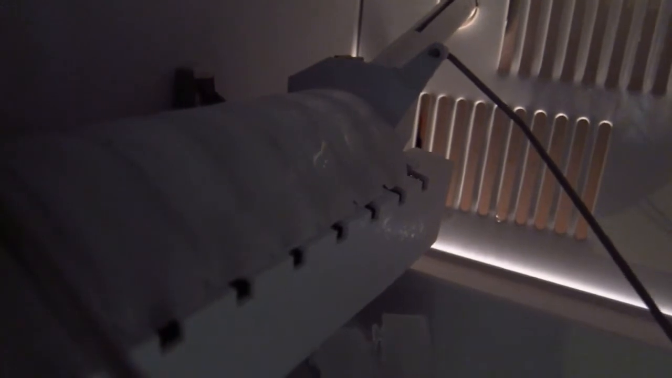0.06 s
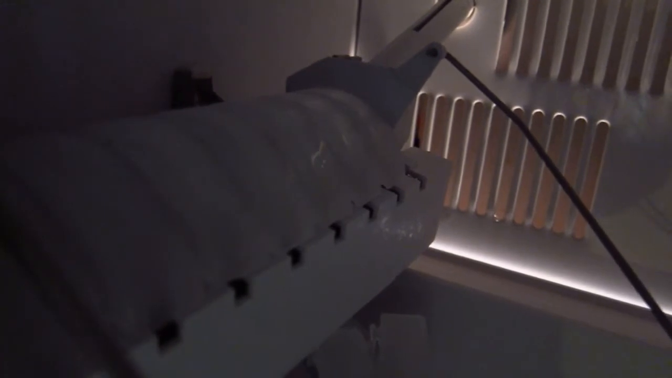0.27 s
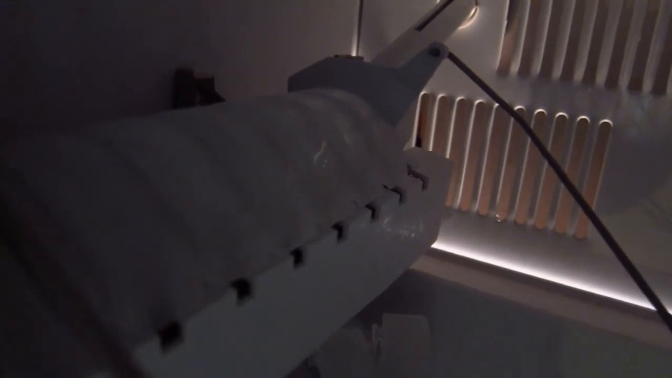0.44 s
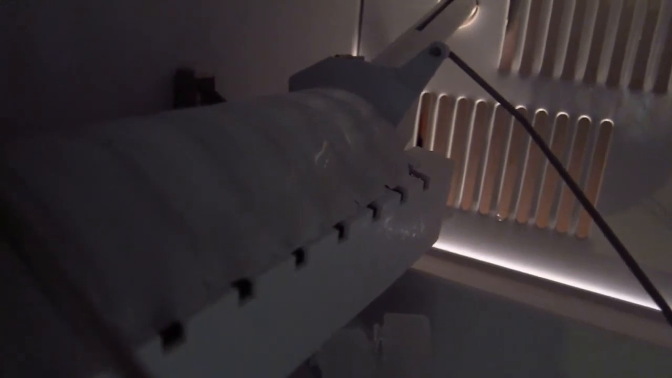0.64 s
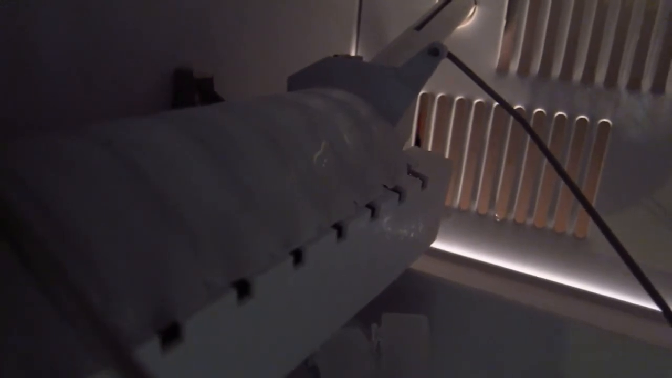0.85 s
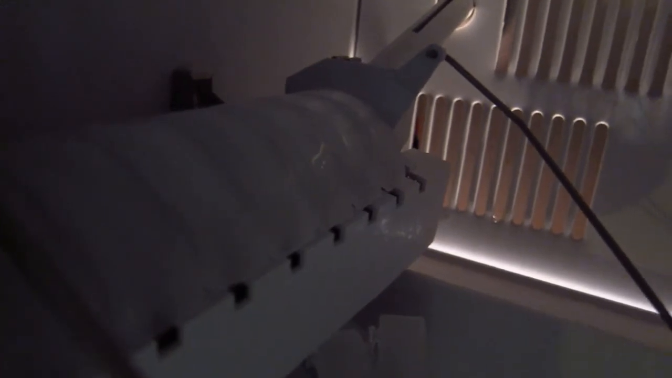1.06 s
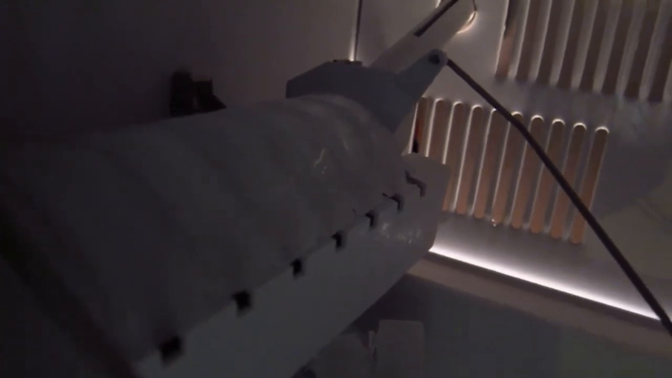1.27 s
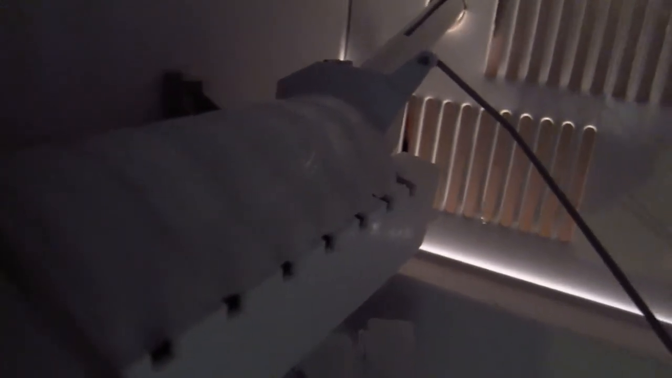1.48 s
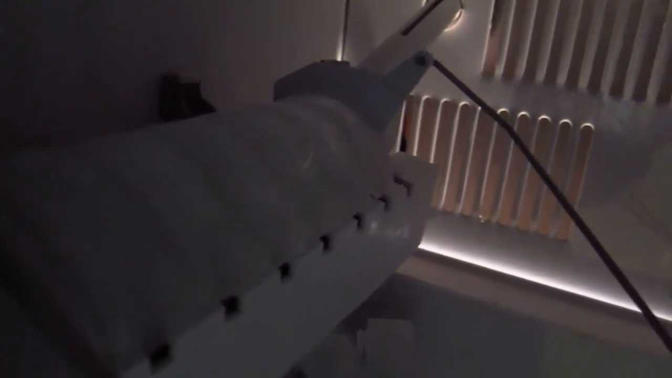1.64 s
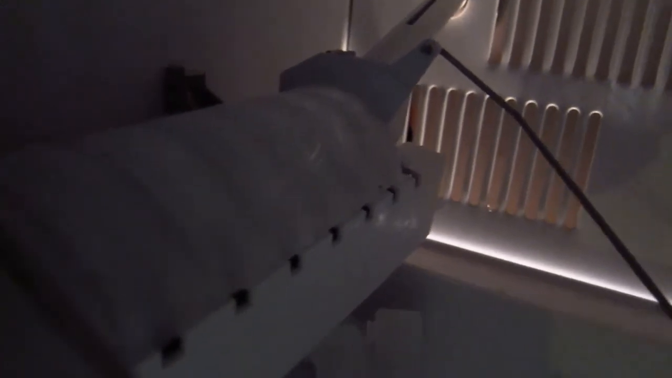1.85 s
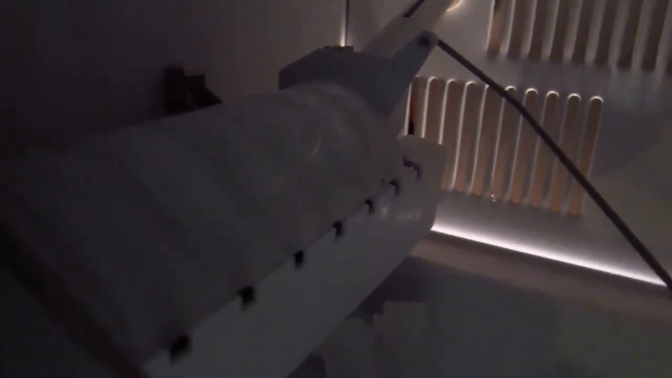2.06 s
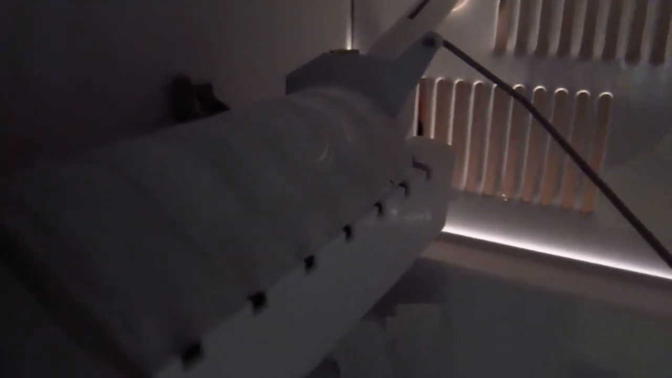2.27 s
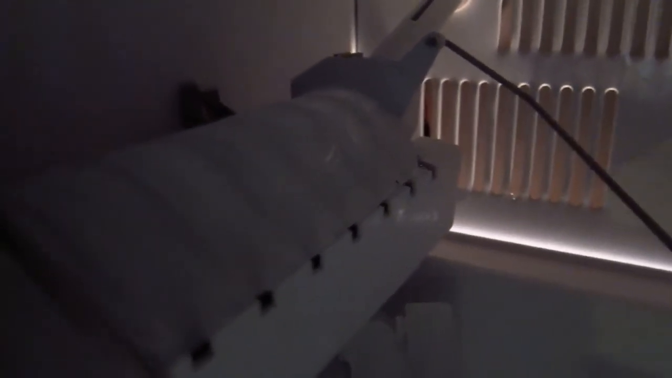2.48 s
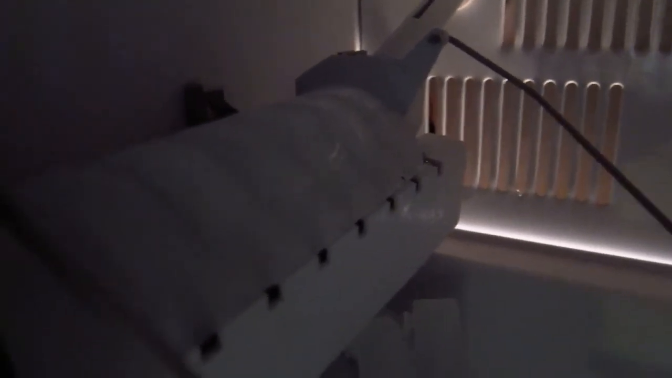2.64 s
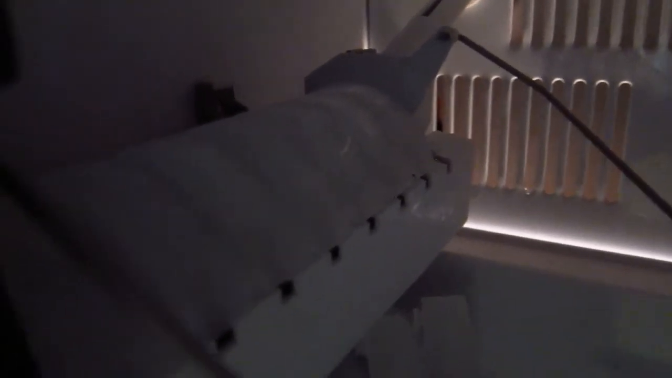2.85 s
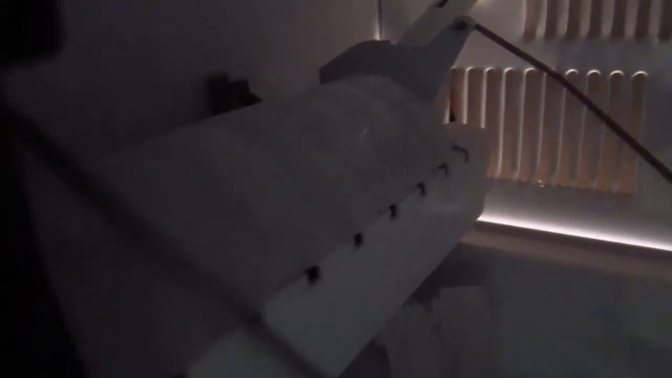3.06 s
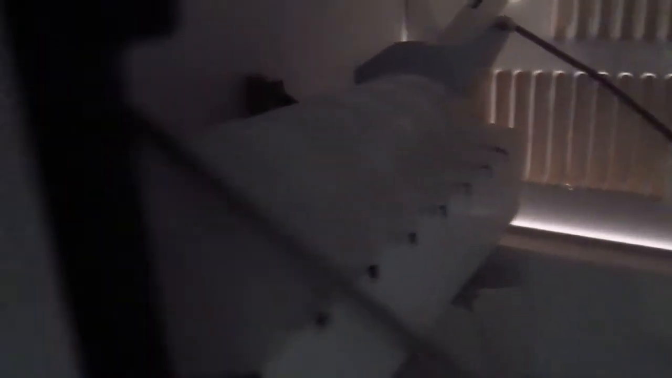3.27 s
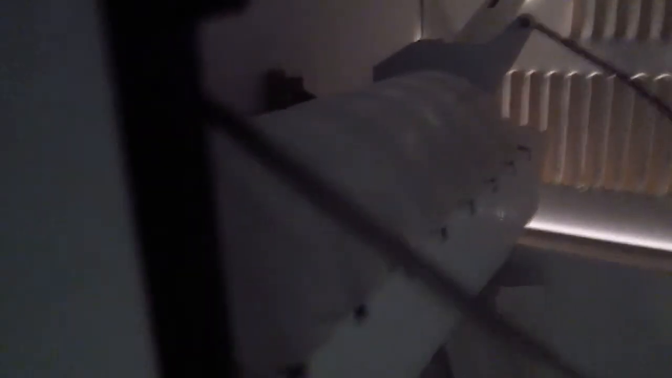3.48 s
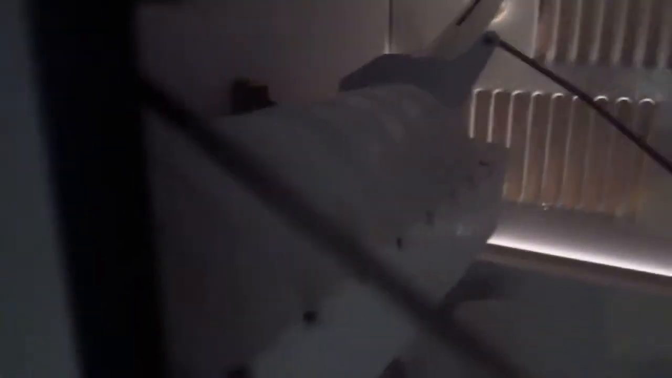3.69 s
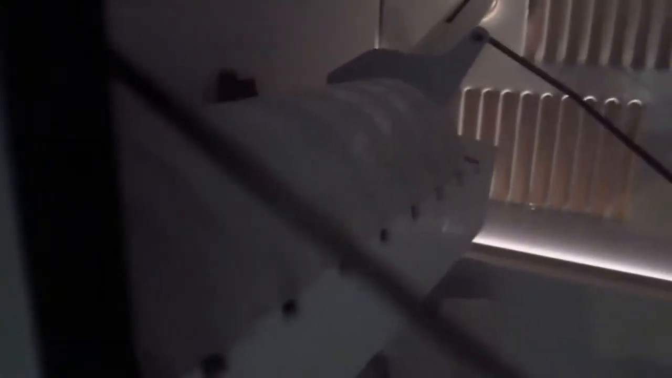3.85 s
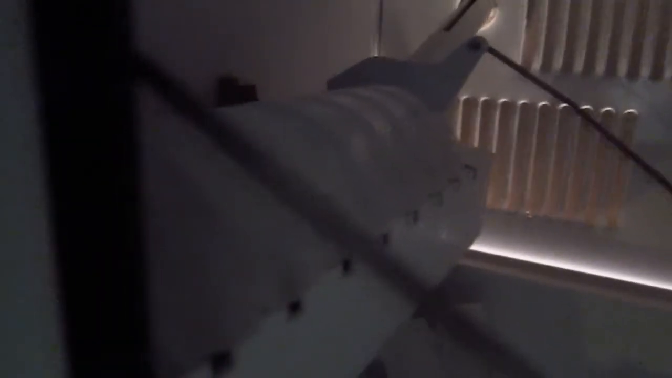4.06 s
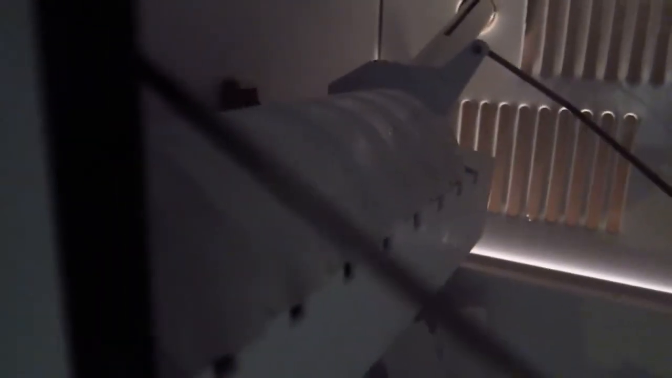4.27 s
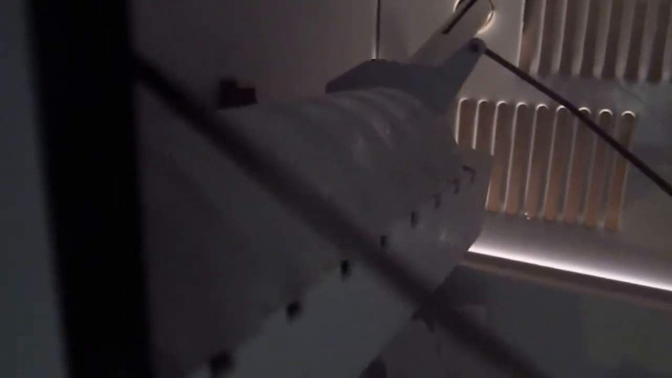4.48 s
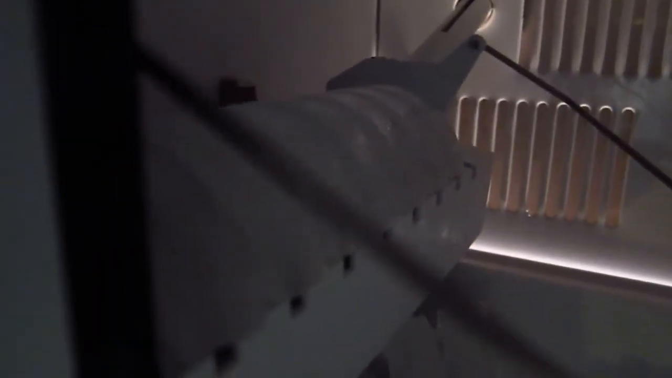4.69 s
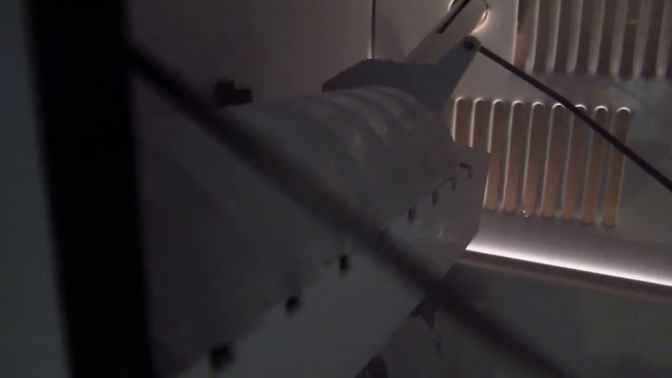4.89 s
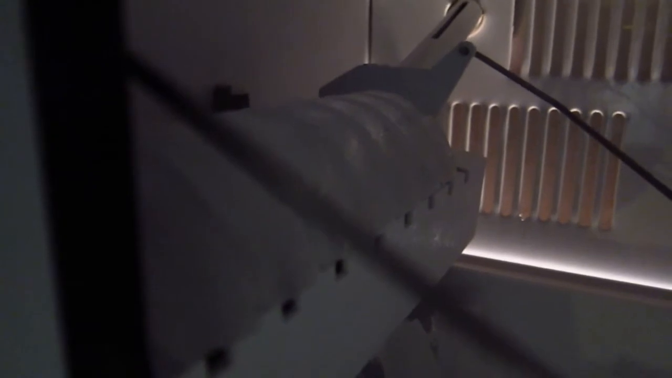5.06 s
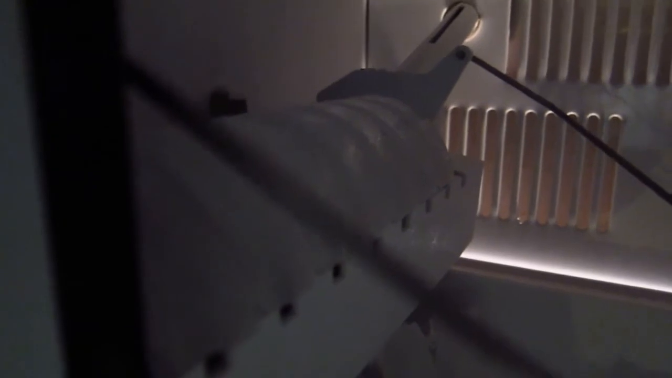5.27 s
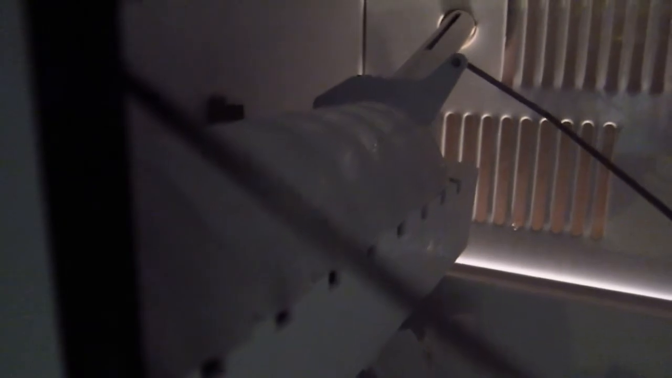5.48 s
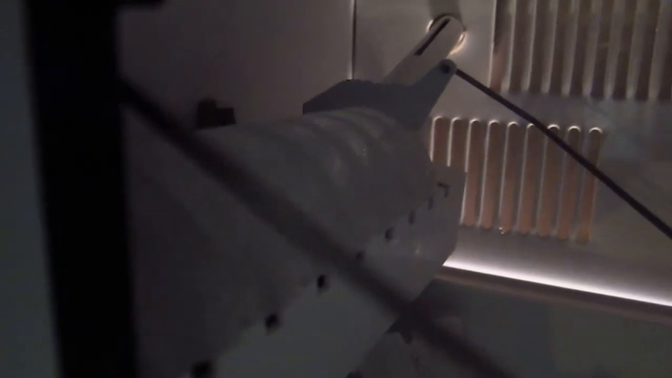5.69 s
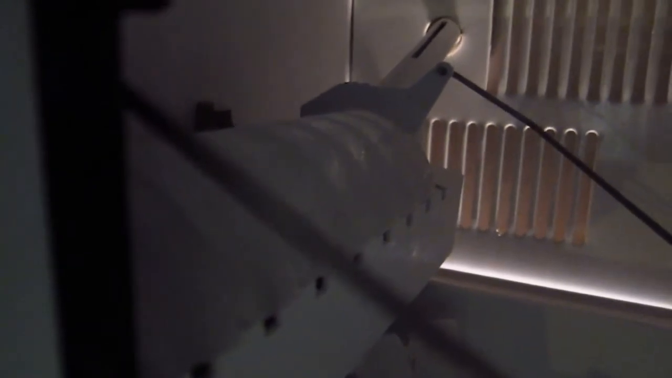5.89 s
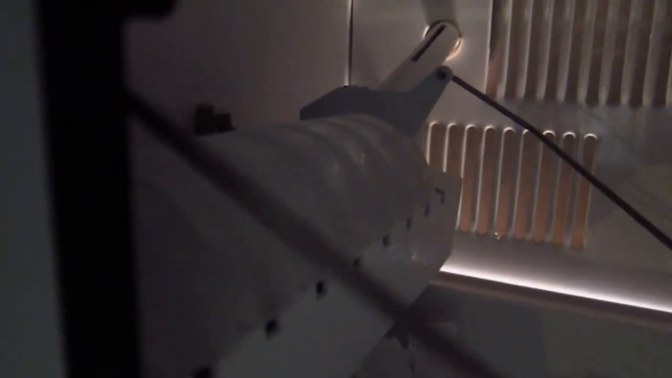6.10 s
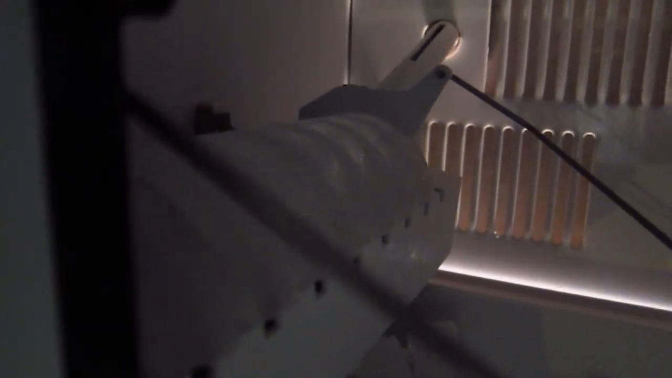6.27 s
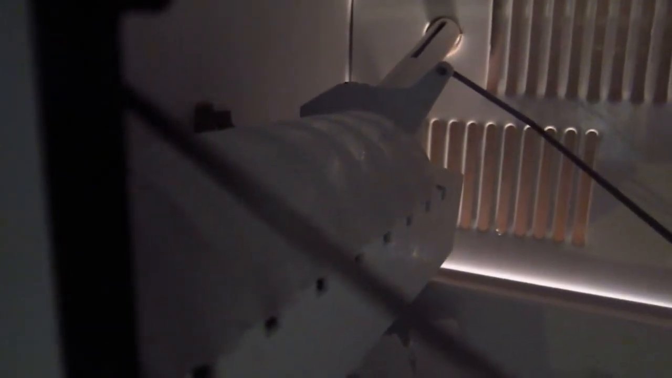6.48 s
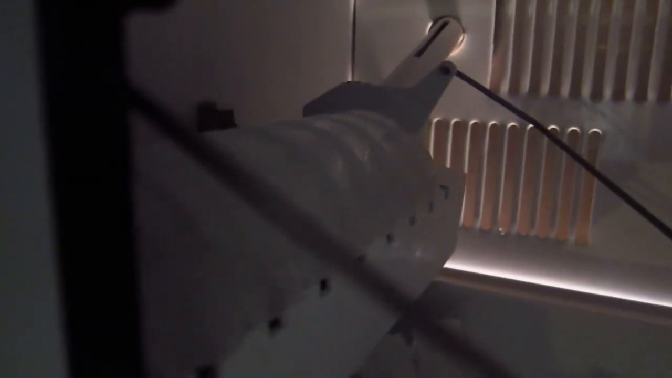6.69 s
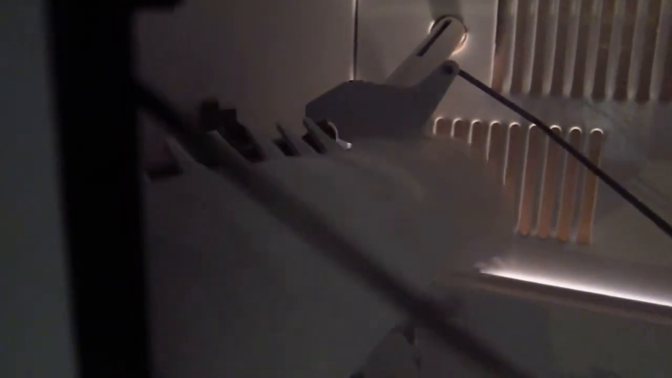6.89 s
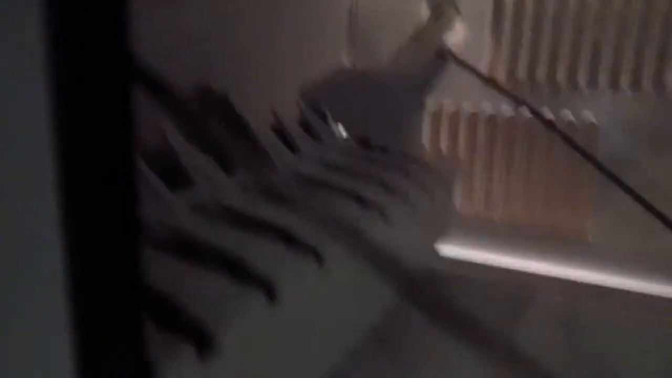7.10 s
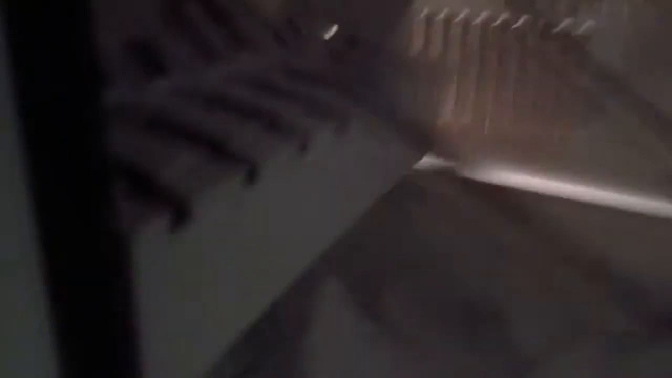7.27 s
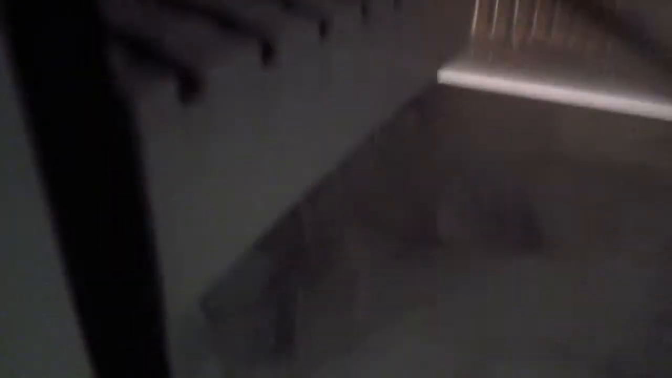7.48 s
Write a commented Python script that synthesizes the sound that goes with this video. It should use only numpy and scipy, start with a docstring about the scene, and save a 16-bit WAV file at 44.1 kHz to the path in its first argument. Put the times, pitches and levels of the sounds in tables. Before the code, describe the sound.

Close inside a freezer: brittle ice cracks, dull cabinet thumps, bright accelerating ticks, a brief juddering scrape, and a burst of cubes tumbling into a bin.

```python
"""Ice cracks, ticks, scrapes and clatters as an ice maker ejects its cubes in a freezer, heard from close by.
Ice breaks loose from the mould as noise bursts ringing the mould and the piece, and jolts swing the cabinet.
The loaded rake slips in ticks that quicken; the ice judders and scrapes over its edge, then lands in the bin.
Behind it moving air is coloured noise, the fan hum a wavering sine, and the gear a soft rub once a turn."""
import sys
import numpy as np
from scipy import signal
from scipy.fft import rfft, irfft
from scipy.io import wavfile
from scipy.ndimage import uniform_filter1d

SR = 44100
rng = np.random.default_rng(int(sys.argv[2]) if len(sys.argv) > 2 else 0)


def generate_wav(sig):
    """Save sig (samples, or channels by samples) to the path in sys.argv[1] as 16-bit PCM at SR."""
    pcm = np.round(np.clip(np.atleast_2d(sig).T, -1, 1) * 32767).astype(np.int16)
    wavfile.write(sys.argv[1], SR, pcm)


N = 332514
TIME = np.arange(N) / SR

# Ice breaking in the mould: start_s [s], level_db [dB], hardness_db [dB], pitch_hz of the piece [Hz]
CRACKS = [(1.026, -41, -20.5, 845), (1.031, -44.5, -20.5, 543), (1.111, -48.5, 9, 11500),
          (1.364, -39, -7, 1460), (1.381, -40.5, 12, 11300), (1.416, -39, -3, 1450), (1.474, -41, -15, 360),
          (1.486, -33, 7, 380), (1.549, -27.5, 4, 3480), (1.583, -30.5, -3, 1500), (1.634, -30, -2, 2160),
          (1.652, -28.5, -1, 3640), (1.748, -25.5, 4, 3190), (1.8, -35.5, 4.5, 3160),
          (1.868, -42, -0.5, 1660), (1.961, -32, 2.5, 1550), (2.06, -44, -8.5, 440),
          (2.112, -31.5, 6, 4570), (2.139, -34, -0.5, 1400), (2.155, -31.5, 3.5, 5830),
          (2.206, -50.5, -11.5, 880), (2.347, -33, -3.5, 3300), (2.942, -36.5, 4.5, 450),
          (3.284, -35, 4.5, 2390), (3.783, -41, 2.5, 3700), (3.877, -43, 14.5, 10710),
          (3.906, -38, 8, 5230), (4.003, -33, 11, 10300), (4.399, -43.5, 2, 4360), (4.415, -44.5, 10, 5300),
          (4.708, -40, 2, 1660)]
# Broad colour of the mould: frequency_hz [Hz], level_db [dB]
MOULD_COLOUR = [(100, -32), (300, -1), (900, -0.5), (1250, -3), (3300, 1), (4500, 0), (7000, -8),
                (11000, -4.5), (16000, -8.5)]
# Resonances of the mould: frequency_hz [Hz], width_hz [Hz], level_db over the broad colour [dB]
MOULD_MODES = [(489, 66, 7.5), (928, 114, 5.5), (1575, 115, 7.5), (2267, 100, 5.5), (2930, 330, 3),
               (3830, 320, -1.5)]
# Spells in which the strained ice crackles: start_s [s], end_s [s], level_db [dB]
STRAINS = [(1.15, 2.594, -54.5), (1.42, 1.715, -43.5), (1.85, 2.18, -46.5), (2.7, 5.2, -61),
           (3.75, 3.95, -52.5)]
STRAIN_RISE_S, STRAIN_FALL_S = 0.05, 0.053


def cracking():
    """Ice breaks loose from the mould, with fine crackle while it is under strain."""
    mould = body(MOULD_COLOUR, MOULD_MODES)
    cracks = blows(CRACKS, mould, t60s=(.06, .05, .05), knock_db=-1.5, fizz_db=-13.5,
                   tail_db=-16, tail_t60=0.13, gain_db=0, rise_s=0.00044,
                   ring_db=4.5, ring_q=3.4, creep_db=-13, creep_s=.004)
    strain = sum(amp(level_db) * spell(start, end, STRAIN_RISE_S, STRAIN_FALL_S)
                 for start, end, level_db in STRAINS)
    crackle = grains(mould, per_s=300, spread_db=6.5, t60=0.063, tail_db=-24,
                     chip_db=12.5, chip_hz=(1400, 12000))
    return cracks + strain * crackle


# Slips of the loaded rake: start_s [s], level_db before the gain [dB], hardness_db [dB]
TICKS = [(2.57, -41.5, 3), (2.852, -47.5, 2.5), (3.023, -36.5, -25), (3.051, -53, 12), (3.09, -38, -12),
         (3.576, -45.5, -14), (3.626, -48.5, 3), (3.677, -47.5, -1), (3.81, -47, 3), (4.159, -45.5, 2.5),
         (4.534, -41, -1.5), (4.925, -60.5, 14.5), (5.168, -51.5, 7.5), (5.601, -47.5, 0),
         (5.656, -42.5, 0.5), (5.782, -37.5, 4), (6.015, -31.5, -1), (6.162, -33, -2.5), (6.296, -32.5, -2),
         (6.417, -36.5, -2), (6.52, -32, -2.5), (6.631, -37.5, -2), (6.74, -35, -2)]
# Broad colour of the rake: frequency_hz [Hz], level_db [dB]
RAKE_COLOUR = [(1000, -11), (3300, -21), (4100, -8), (5500, -6), (7300, -10.5), (10500, -3.5), (13000, -8),
               (16000, -18)]
# Resonances of the rake: frequency_hz [Hz], width_hz [Hz], level_db over the broad colour [dB]
RAKE_MODES = [(4060, 190, 7.8), (5240, 390, 6.8), (6060, 160, 10.5), (11000, 87, 1.7), (11900, 170, 2)]
TICK_HZ, TICK_SPREAD = 4880, 0.087  # every slip rings near one pitch; spread in natural-log pitch
# faint slips gather as the rake bites into the ice, then thin out
FAINT_FROM_S, FAINT_MOST_S, FAINT_UNTIL_S = 3.2, 3.65, 4.6
FAINT_DB, FAINT_SPREAD_DB = -50.5, 2.5  # before the gain


def ticking(faint_count=8):
    """The loaded rake slips in short bright ticks, with faint ones scattered among them."""
    times = rng.triangular(FAINT_FROM_S, FAINT_MOST_S, FAINT_UNTIL_S, faint_count)
    faint = [(s, FAINT_DB + FAINT_SPREAD_DB * rng.standard_normal(), 0) for s in times]
    slips = [(*row, TICK_HZ * np.exp(TICK_SPREAD * rng.standard_normal())) for row in TICKS + faint]
    return blows(slips, body(RAKE_COLOUR, RAKE_MODES), t60s=(.04, .04, .04), knock_db=-34, fizz_db=-5.0,
                 tail_db=-46, tail_t60=0.062, gain_db=1.5, rise_s=0.00018,
                 ring_db=1.0, ring_q=16, creep_db=-20, creep_s=0.0019)


# Ice snapping past the rake: start_s [s], level_db before the gain [dB], hardness_db [dB], pitch_hz [Hz]
SNAPS = [(6.761, -31, -8, 3130), (6.788, -16, 4.5, 5210), (6.824, -20, 9, 4630), (6.835, -19, -1, 5600),
         (6.854, -19, 1, 4970), (6.866, -23, -2, 2420), (6.921, -22, -2, 2620), (6.932, -19, -2, 2680),
         (6.956, -24.5, -11, 2500), (6.993, -14, -1, 4800), (7.038, -26.5, -9, 2280)]
# Broad colour of the slide: frequency_hz [Hz], level_db [dB]
SLIDE_COLOUR = [(100, 1), (300, 5), (600, 3.5), (1100, -6), (2000, -7), (2600, -5.5), (5500, -3.5),
                (7300, -11.5), (11000, -11.5), (16000, -20)]
# Resonances of the slide: frequency_hz [Hz], width_hz [Hz], level_db over the broad colour [dB]
SLIDE_MODES = [(1747, 26, 10.3), (2420, 55, 13.5), (2750, 88, 7.2), (3190, 180, 7.3), (5460, 72, 2.1),
               (10000, 65, 6)]
# the ice slides over the rake in one push, which drives both the judder and the scrape
SLIDE_FROM_S, SLIDE_UNTIL_S, SLIDE_RISE_S = 6.775, 6.95, 0.014
SCRAPE_DB, SCRAPE_FALL_S = -24.5, 0.044


def sliding():
    """The ice scrapes over the rake in many tiny fractures and snaps past its teeth."""
    slide = body(SLIDE_COLOUR, SLIDE_MODES)
    snaps = blows(SNAPS, slide, t60s=(.06, .04, .04), knock_db=-9.0, fizz_db=-7.5,
                  tail_db=-43, tail_t60=0.13, gain_db=1.5, rise_s=0.00064,
                  ring_db=5.0, ring_q=21, creep_db=-8, creep_s=0.0046)
    push = amp(SCRAPE_DB) * spell(SLIDE_FROM_S, SLIDE_UNTIL_S, SLIDE_RISE_S, SCRAPE_FALL_S)
    scrape = grains(slide, per_s=450, spread_db=3.5, t60=0.028, tail_db=-11,
                    chip_db=0, chip_hz=(2300, 12000))
    return snaps + push * scrape


# Cubes landing in the bin: start_s [s], level_db before the gain [dB], hardness_db [dB], pitch_hz [Hz]
CUBES = [(7.055, -12.5, 2.5, 1660), (7.066, -14.5, -4.5, 1380), (7.076, -19.5, -3.5, 2900),
         (7.098, -17, -2.5, 2500), (7.106, -19, -3.5, 3200), (7.114, -26, -3, 1750),
         (7.174, -19.5, 1, 2360), (7.185, -18, 5.5, 5200), (7.195, -20, 3, 4700), (7.209, -19.5, 0, 1520),
         (7.227, -22, 1.5, 2880), (7.267, -26, -0.5, 3560), (7.28, -28, -2, 3250), (7.293, -27.5, 0, 1000),
         (7.304, -22, 0.5, 2500), (7.329, -32, -3, 2620), (7.375, -29.5, 7.5, 6100),
         (7.402, -31.5, 11.5, 6260), (7.414, -37.5, -3, 5350), (7.461, -35.5, -1.5, 3720),
         (7.482, -54, -15, 810)]
# Broad colour of the bin: frequency_hz [Hz], level_db [dB]
BIN_COLOUR = [(70, 0), (160, 4), (350, 0.5), (900, 1.5), (1700, 0.5), (3300, -2), (5500, -4), (7300, -16),
              (11000, -19.5), (16000, -26.5)]
# Resonances of the bin: frequency_hz [Hz], width_hz [Hz], level_db over the broad colour [dB]
BIN_MODES = [(243, 99, 3.8), (505, 87, 6.4), (868, 160, 5.8), (1063, 36, 4.1), (1360, 40, 5.4),
             (1416, 57, 9.2), (1630, 95, 10.2), (1735, 59, 9.6), (2000, 12, 1.9), (2070, 20, 3.2),
             (2440, 45, 4.8), (2990, 70, 5), (3360, 37, 8.1), (3720, 37, 7.2), (4800, 190, 1.3)]
JOSTLE_DB, JOSTLE_LAG_S, SETTLE_S = -9.5, 0.0066, 0.045  # each landing stirs the pile, which then settles


def falling():
    """Cubes land in the bin; the heavier and duller the landing, the more it jostles the pile just after."""
    ice_bin = body(BIN_COLOUR, BIN_MODES)
    landings = blows(CUBES, ice_bin, t60s=(.055, .045, .045), knock_db=-1.5, fizz_db=-10.0,
                     tail_db=-6.5, tail_t60=0.14, gain_db=0.5, rise_s=0.00042,
                     ring_db=1.5, ring_q=4.1, creep_db=-16, creep_s=0.0035)
    stirs = []
    for s, level_db, hardness_db, _ in CUBES:
        peak_s = s + JOSTLE_LAG_S
        stir = spell(peak_s, peak_s, JOSTLE_LAG_S / 2, SETTLE_S)
        stirs.append(amp(level_db - hardness_db + JOSTLE_DB) * stir)
    pile = grains(ice_bin, per_s=490, spread_db=2.5, t60=0.028, tail_db=-16,
                  chip_db=2, chip_hz=(800, 10000))
    return landings + np.linalg.norm(stirs, axis=0) * pile  # the stirs add as powers


JUDDER_DB, JUDDER_FALL_S = -16, 0.039
JUDDER_HZ, JUDDER_SAG_HZ_PER_S = 113.5, 88.6


def judder(second_db=-18, third_db=-26, jitter=0.091, uneven_db=3.5):
    """Stick and slip shakes the ice maker about a hundred times a second, slowing as the ice comes free."""
    elapsed = np.clip(TIME, SLIDE_FROM_S, SLIDE_UNTIL_S) - SLIDE_FROM_S
    hz = JUDDER_HZ - JUDDER_SAG_HZ_PER_S * elapsed
    angle = 2 * np.pi * np.cumsum(hz * (1 + jitter * wander(rate_hz=43.8))) / SR
    shake = np.sin(angle) + amp(second_db) * np.sin(2 * angle) + amp(third_db) * np.sin(3 * angle)
    shake = band(shake * amp(uneven_db * wander(rate_hz=46.5)), low_hz=67.6, high_hz=900)
    push = amp(JUDDER_DB) * spell(SLIDE_FROM_S, SLIDE_UNTIL_S, SLIDE_RISE_S, JUDDER_FALL_S)
    return unit(shake) * push * amp([[-.4], [.4]])  # a little stronger on the right


# Jolts that shake the cabinet: start_s [s], level_db [dB], rattle_db relative to the swing [dB]
THUMPS = [(1.067, -32, -5.5), (1.352, -26.5, -14), (1.468, -24, 0.5), (1.585, -32.5, -5), (1.75, -39, -10),
          (1.982, -31.5, -21), (2.031, -34, -16), (2.937, -16, -10.5), (3.751, -31, -39), (4.03, -40.5, -6),
          (6.801, -24.5, 2), (6.848, -18.5, -12), (6.935, -18, -3), (7.056, -25, 1)]
# Modes of the cabinet walls: frequency_hz [Hz], level_db [dB], t60_s [s]
CABINET_MODES = [(64, -37, 0.96), (83.3, -1, 0.33), (109.3, 4.5, 0.23), (119, -7, 0.28), (158.4, -11, 0.31),
                 (167.4, -14.5, 0.33), (255, -9, 0.1), (287, -23.5, 0.46)]
REBOUND_S, REBOUND_DB, REBOUND_LOSS_DB = .084, -21.5, -2  # the ice maker rocks back a few times after a jolt


def cabinet(rise_s=0.0071, rattle_t60=0.17, knock_db=-5, knock_t60=0.15, vary_db=1.5, size=22050, rebounds=3):
    """Jolts swing the wall panels at their low modes, with a dull rattle of loose parts and weak rebounds."""
    out, t = np.zeros((2, N)), np.arange(size) / SR
    for s, level_db, rattle_db in THUMPS:
        swing = np.zeros(size)
        for hz, mode_db, t60 in CABINET_MODES:
            share = amp(vary_db * rng.standard_normal())
            swing += share * amp(mode_db - 60 * t / t60) * np.sin(2 * np.pi * hz * t)
        swing = band(swing, low_hz=63.6, high_hz=900)
        loose = noise_pair(LIKENESS, size)
        rattle = band(loose * amp(-60 * t / rattle_t60), low_hz=172.4, high_hz=284)
        knock = band(loose * amp(-60 * t / knock_t60), low_hz=292, high_hz=605)
        rattle += amp(knock_db + rattle_db) * knock  # a sharper jolt also knocks higher
        thump = swing / loudest(swing[None], size=440)
        thump = thump + amp(rattle_db) * rattle / loudest(rattle, size=440)
        thump *= 1 - np.exp(-t / rise_s)
        thump *= amp(level_db) / loudest(thump, size=440)
        add(out, s, thump)
        for k in range(rebounds):
            add(out, s + (k + 1) * REBOUND_S, amp(REBOUND_DB + k * REBOUND_LOSS_DB) * thump)
    return out * amp([[-.4], [.4]])  # a little stronger on the right


# How hard the gear rubs: time_s [s], level_db [dB]
RUB_PRESSURE = [(0.1, -47), (.52, -44), (.92, -58), (1.2, -45), (1.86, -43.5), (2.5, -47.5), (2.8, -57.5),
                (4.12, -63), (4.26, -44), (4.52, -46), (4.66, -62), (4.79, -47), (5.05, -63), (5.2, -46.5),
                (5.46, -47.5), (5.6, -52), (6.1, -52), (6.26, -46.5), (6.66, -54)]
# Resonances of the gear housing: frequency_hz [Hz], width_hz [Hz], level_db [dB]
GEAR_MODES = [(440, 33, -4), (550, 38, -3.5)]
FIRST_RUB_S, GEAR_TURN_S, RUB_SPREAD_DB = .1185, .1334, 1  # the gear rubs once a turn


def gear(swell_s=0.0078, swell_db=-9, catch_s=0.0036, size=4096):
    """Once a turn a soft rub swells, catches with a short tick and fades, sounding the gear housing."""
    out, t = np.zeros((2, N)), (np.arange(size) - size / 2) / SR
    contact = amp(swell_db) * np.exp(-(t / swell_s) ** 2 / 2) + np.exp(-abs(t) / catch_s)
    for s in np.arange(FIRST_RUB_S, SLIDE_FROM_S, GEAR_TURN_S):
        level_db = np.interp(s, *np.transpose(RUB_PRESSURE)) + RUB_SPREAD_DB * rng.standard_normal()
        friction = noise_pair(LIKENESS, size) * contact
        rub = sum(amp(mode_db) * resonance(friction, hz, width) for hz, width, mode_db in GEAR_MODES)
        rub = band(rub, low_hz=315, high_hz=1000)
        add(out, s + t[0], amp(level_db) * rub / loudest(rub, size=900))
    return out


# Broad colour of the moving air: frequency_hz [Hz], level_db [dB]
AIR_COLOUR = [(25, -21.5), (64, -10), (110, -9.5), (160, -13), (250, -14.5), (370, -17.5), (470, -17),
              (890, -24.5), (2000, -28.5), (2900, -30), (6000, -37.5), (9500, -41.5), (12000, -40),
              (16000, -49)]
# Left-right likeness of the air at the microphones: frequency_hz [Hz], likeness [0-1]
AIR_LIKENESS = [(60, 0.45), (200, 0.43), (600, 0.3), (1300, 0.092), (8000, 0)]
# Fan hum before its waver: time_s [s], level_db [dB rms]
HUM = [(0, -51), (1, -52.5), (2.8, -69.5), (4.5, -57), (5.4, -51.5), (6.6, -49), (7.54, -54)]
HUM_HZ = 119.3
AIR_DB = -54  # rms between 700 and 6000 Hz


def fan(waver_db=2.5, drift=0.0067):
    """Moving air is coloured noise; the hum is a sine wavering in level and pitch."""
    air_gain = amp(read(AIR_COLOUR, np.fft.rfftfreq(N, 1 / SR)))
    air = irfft(rfft(noise_pair(AIR_LIKENESS, N)) * air_gain, N)
    air *= amp(AIR_DB) / band(air, 700, 6000).std()
    turns = np.cumsum(HUM_HZ * (1 + drift * wander(rate_hz=6.1))) / SR
    hum = np.sqrt(2) * level(HUM) * amp(waver_db * wander(rate_hz=5.5)) * np.sin(2 * np.pi * turns)
    return air + hum


# Bands of the knock, the crack and the fizz: low_hz [Hz], high_hz [Hz]
BAND_EDGES_HZ = [(100, 2000), (2000, 7500), (7500, 18000)]


def blows(rows, response, t60s, knock_db, fizz_db, tail_db, tail_t60, gain_db, rise_s,
          ring_db, ring_q, creep_db, creep_s):
    """Blows ring a body and the piece as knock, crack and fizz; a harder contact trades knock for fizz."""
    out = np.zeros((2, N))
    for s, level_db, hardness_db, ring_hz in rows:
        shares_db = (knock_db - hardness_db, 0, fizz_db + hardness_db)
        lead = creep_s * rng.uniform(0.55, 1.6)
        for share_db, t60, edges in zip(shares_db, t60s, BAND_EDGES_HZ):
            burst = scatter(t60, tail_db, tail_t60)
            onset = 1 - np.exp(-TIME[:burst.shape[1]] / rise_s)  # the contact takes a moment to build
            burst = through(burst * onset, response)
            piece = resonance(burst, ring_hz, ring_hz / ring_q + 40)
            ring = band(burst + amp(ring_db) * piece, *edges)
            ring *= amp(level_db + share_db + gain_db) / loudest(ring)
            add(out, s, ring)
            add(out, s - lead, amp(creep_db) * ring)  # a light first touch comes just before
    return out


def grains(response, per_s, spread_db, t60, tail_db, chip_db, chip_hz, count=24):
    """Many tiny fractures, a few much larger, at spots of one body that each ring at their own pitch."""
    strength = amp(spread_db * np.minimum(rng.exponential(1, N), 3))
    fractures = strength * (rng.random(N) < per_s / SR)
    spot, out = rng.integers(0, count, N), np.zeros((2, N))
    for k, hz in enumerate(np.geomspace(*chip_hz, count)):
        burst = through(scatter(t60, tail_db, tail_t60=0.17), response)
        ring = burst + amp(chip_db) * resonance(burst, hz, hz / 10)
        out += signal.oaconvolve((fractures * (spot == k))[None], ring, axes=1)[:, :N]
    return unit(band(out, low_hz=110, high_hz=17900))


# Left-right likeness of the struck sounds at the microphones: frequency_hz [Hz], likeness [0-1]
LIKENESS = [(60, 1), (300, 0.98), (650, 0.92), (1400, 0.54), (3100, 0.24), (7000, 0.01), (15000, 0.13)]


def scatter(t60, tail_db, tail_t60, size=8192):
    """A click bouncing between the close walls: a quick dense burst and a weaker tail."""
    t = np.arange(size) / SR
    return noise_pair(LIKENESS, size) * (amp(-60 * t / t60) + amp(tail_db - 60 * t / tail_t60))


def noise_pair(likeness, size):
    """White noise at two microphones, as alike at each frequency as the likeness says."""
    mid, side = rfft(rng.standard_normal((2, size)))
    same = np.clip(read(likeness, np.fft.rfftfreq(size, 1 / SR)), -1, 1)
    mid, side = mid * np.sqrt((1 + same) / 2), side * np.sqrt((1 - same) / 2)
    return irfft(np.array([mid + side, mid - side]), size)


def body(colour, modes, size=4096):
    """Causal impulse response of a broad colour with resonances standing out of it."""
    hz = abs(np.fft.fftfreq(size, 1 / SR))
    peaks = sum((amp(db) - 1) / (1 + (2 * (hz - f) / width) ** 2) for f, width, db in modes)
    log_gain = np.log(amp(read(colour, hz)) * np.maximum(1 + peaks, .1))
    spectrum = np.exp(signal.hilbert(log_gain).conj())  # minimum phase
    return np.fft.ifft(spectrum).real[None, :size // 2]


def resonance(x, hz, width_hz):
    """One decaying mode of gain 1 at its peak."""
    return signal.lfilter(*signal.iirpeak(hz, hz / width_hz, SR), x)


def through(x, response):
    """Convolves, keeping the length."""
    return signal.fftconvolve(x, response, axes=1)[:, :x.shape[1]]


def band(x, low_hz, high_hz):
    """Causal band-pass."""
    sos = signal.butter(4, [low_hz, min(high_hz, SR / 2 - 1)], "band", fs=SR, output="sos")
    return signal.sosfilt(sos, x)


def spell(start, end, rise_s, fall_s):
    """Gain that swells up to start, holds at 1 until end and dies away."""
    return np.exp(-np.maximum(start - TIME, 0) / rise_s - np.maximum(TIME - end, 0) / fall_s)


def wander(rate_hz):
    """Random drift slower than rate_hz, of rms 1."""
    slow = np.fft.rfftfreq(N, 1 / SR) < rate_hz
    return unit(irfft(rfft(rng.standard_normal(N)) * slow, N))


def level(curve):
    """Gain over time from (time_s, level_db) rows, silent outside them."""
    return np.nan_to_num(amp(np.interp(TIME, *np.transpose(curve), left=np.nan, right=np.nan)))


def read(points, hz):
    """Reads a spectrum on a log-frequency axis."""
    f, value = np.transpose(points)
    return np.interp(np.log(hz + 1), np.log(f), value)


def loudest(x, size=190):
    """Rms of the loudest stretch of size samples."""
    return np.sqrt(uniform_filter1d((x ** 2).mean(0), size).max() + 1e-20)


def amp(db):
    """Decibels to gain."""
    return 10 ** (np.asarray(db) / 20)


def unit(x):
    """Scales to rms 1."""
    return x / np.sqrt(np.mean(x ** 2) + 1e-20)


def add(mix, s, sound):
    """Mixes a sound in at time s."""
    part = mix[:, max(round(s * SR), 0):][:, :sound.shape[-1]]
    part += sound[..., :part.shape[-1]]


def scene():
    """Cracking loose, ticking, sliding and falling, over the running machine."""
    ice = cracking() + ticking() + sliding() + falling()
    return ice + judder() + cabinet() + gear() + fan()


def record(dry, notch_hz=8270, notch_width_hz=520, cutoff_hz=16000):
    """The microphone has a deep narrow notch in the treble; then the band limit."""
    hz = np.fft.rfftfreq(N, 1 / SR)
    offset = ((hz - notch_hz) / notch_width_hz) ** 2
    heard = irfft(rfft(dry) * offset / (1 + offset), N)
    low_pass = signal.firwin(255, cutoff_hz, window=("kaiser", 9), fs=SR)
    return signal.oaconvolve(np.clip(heard, -1, 1), low_pass[None], "same")


dry = scene()
out = record(dry)
generate_wav(out)
```